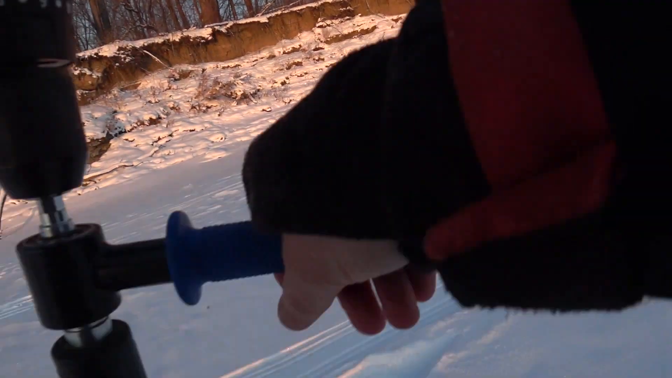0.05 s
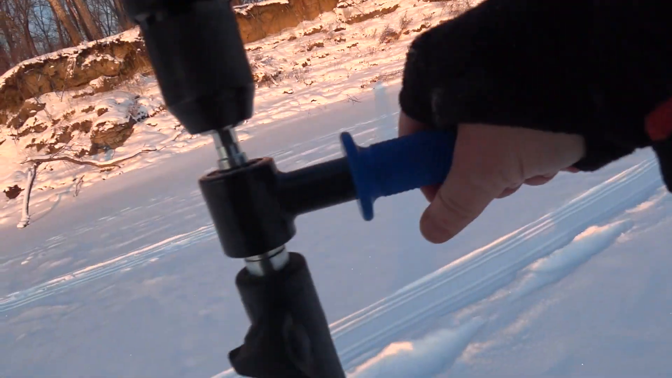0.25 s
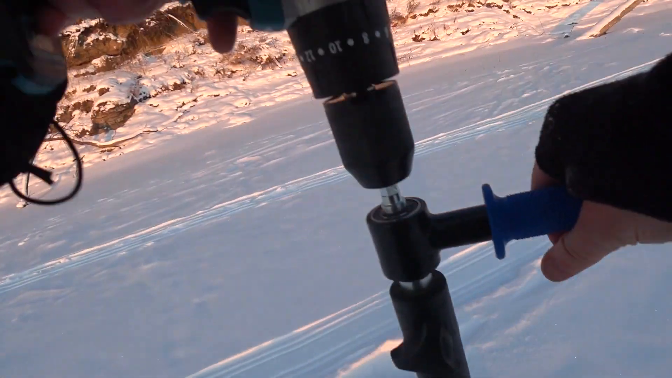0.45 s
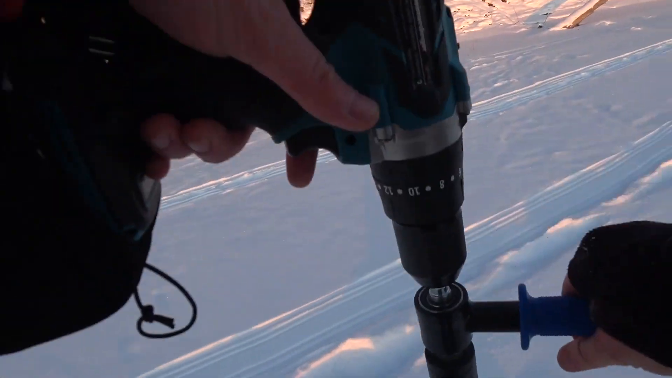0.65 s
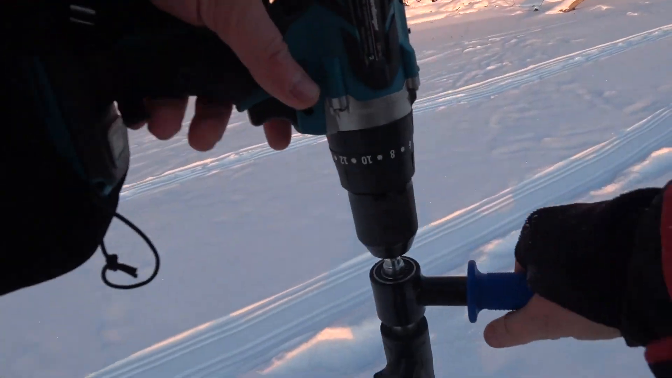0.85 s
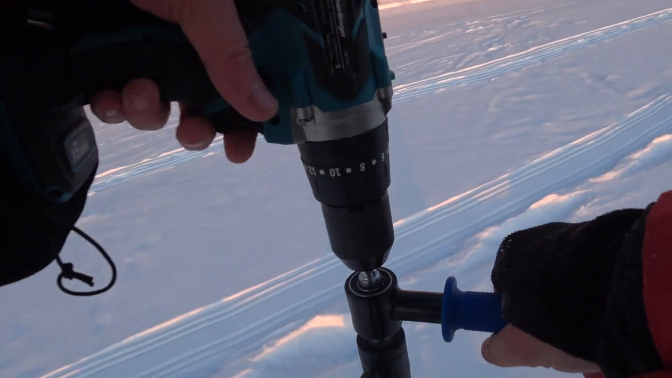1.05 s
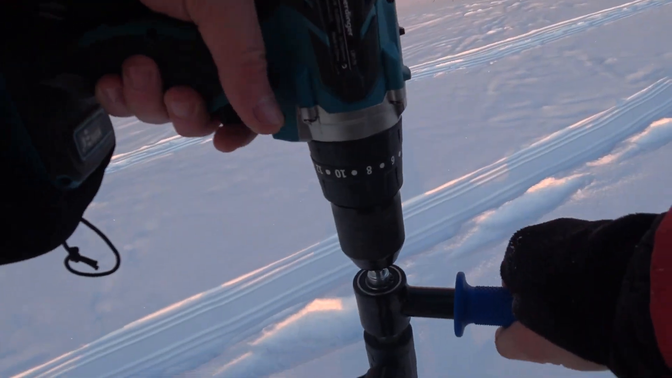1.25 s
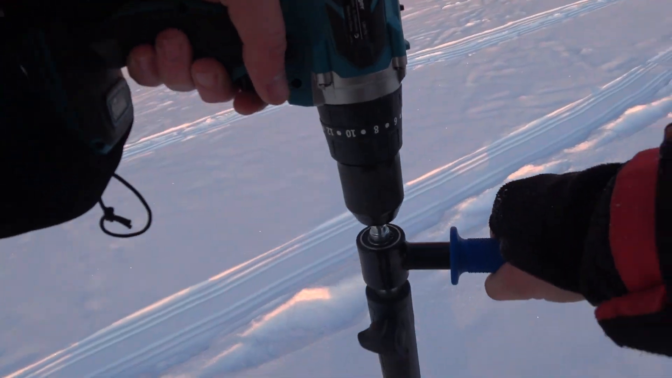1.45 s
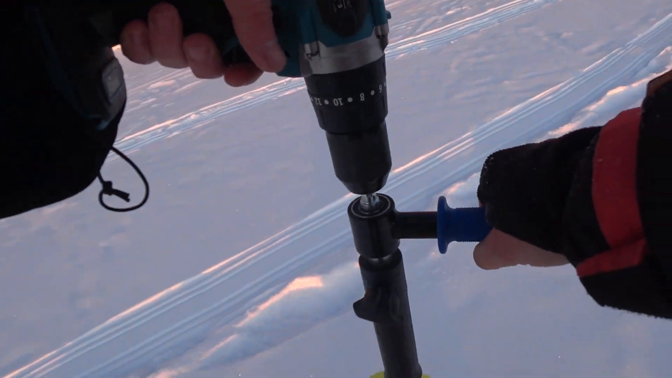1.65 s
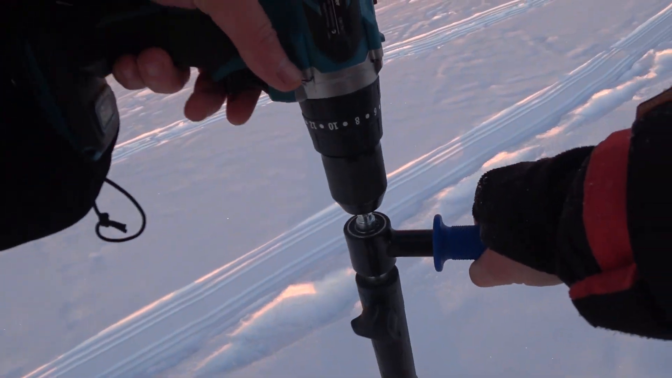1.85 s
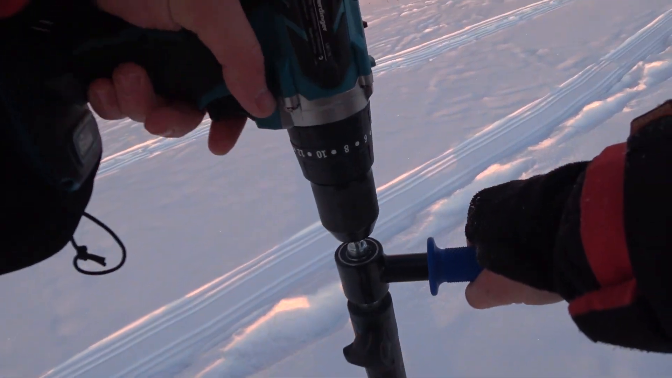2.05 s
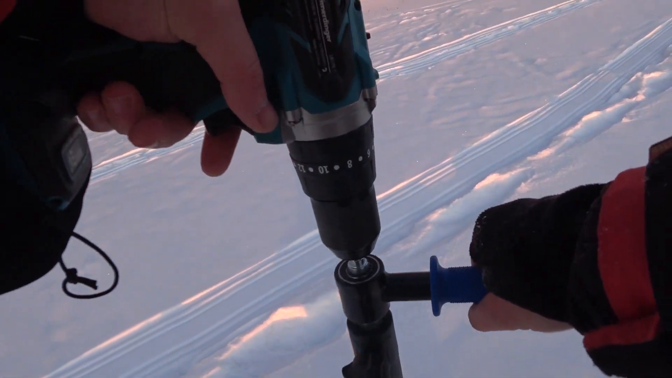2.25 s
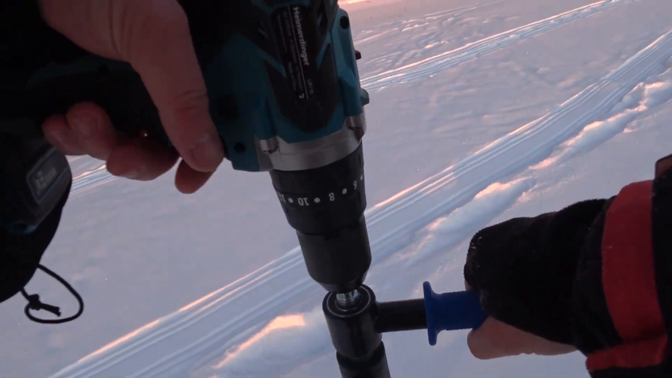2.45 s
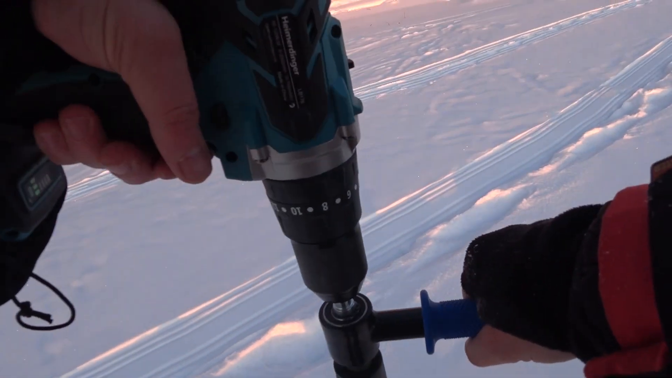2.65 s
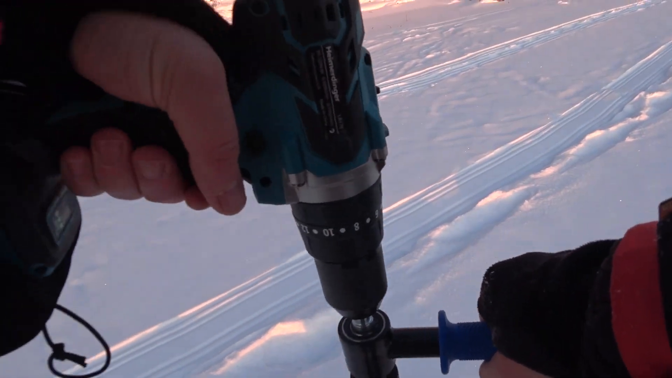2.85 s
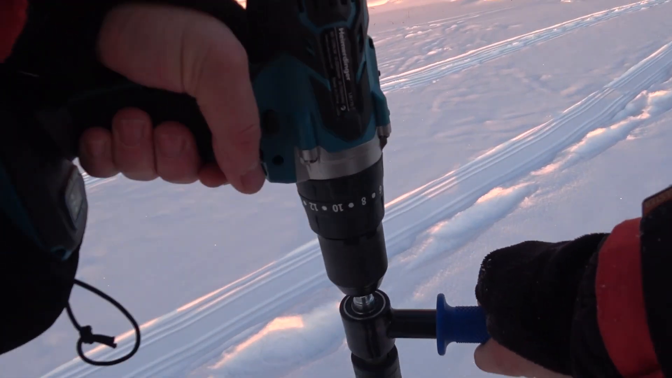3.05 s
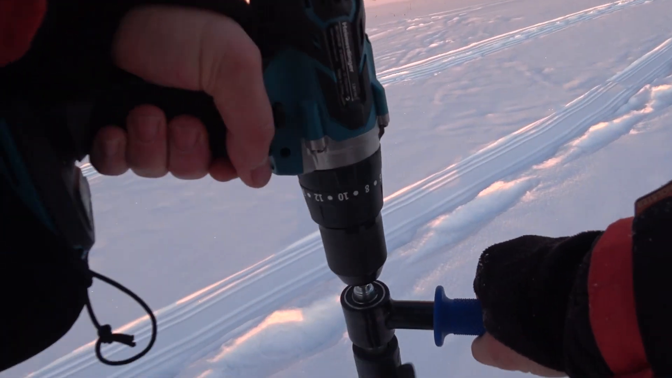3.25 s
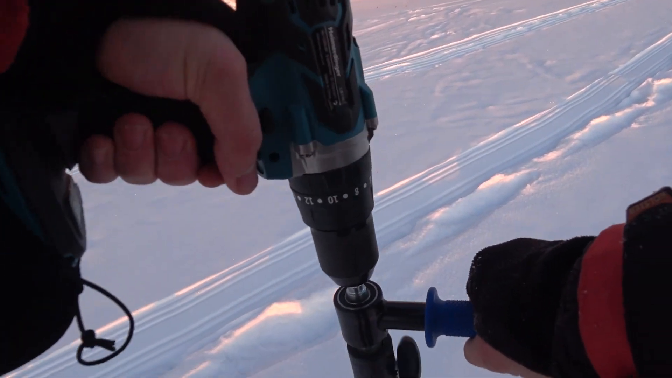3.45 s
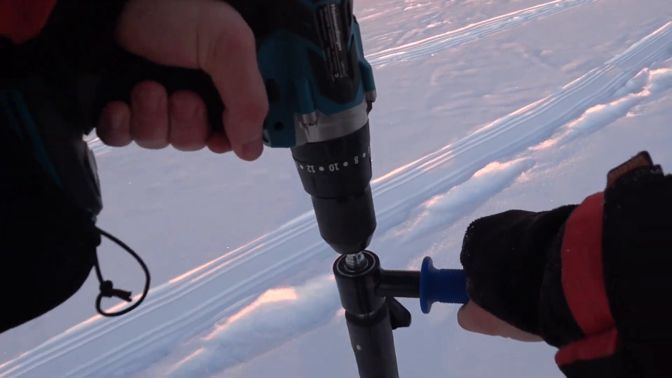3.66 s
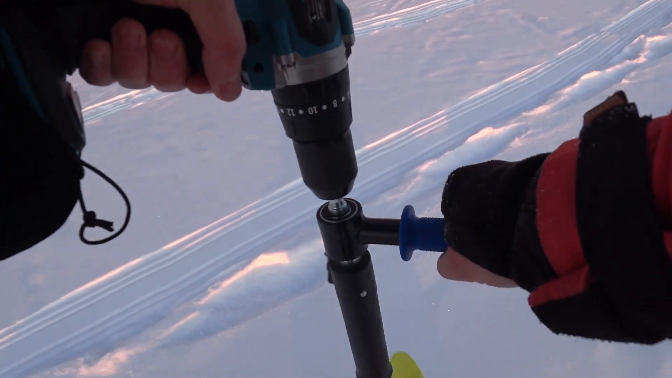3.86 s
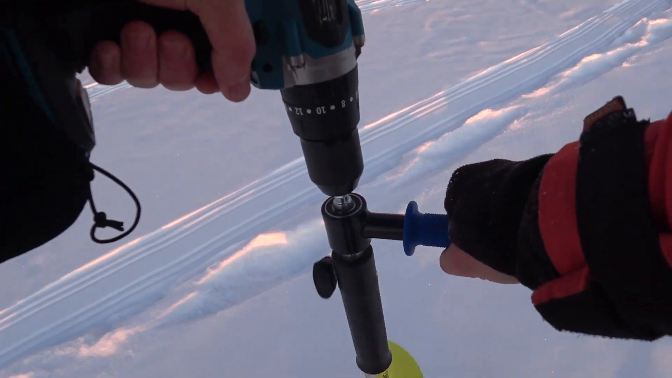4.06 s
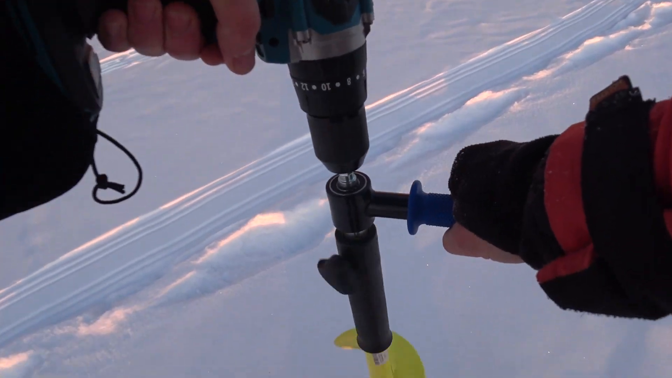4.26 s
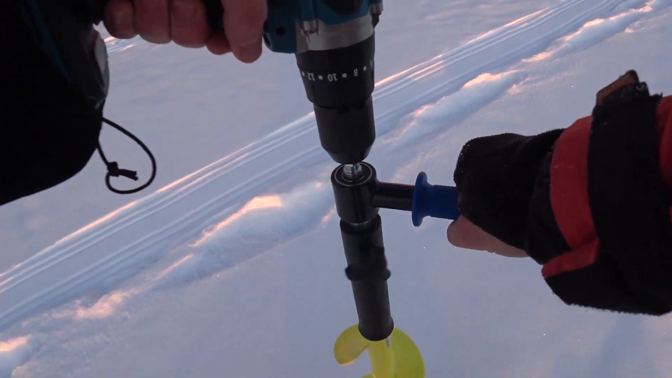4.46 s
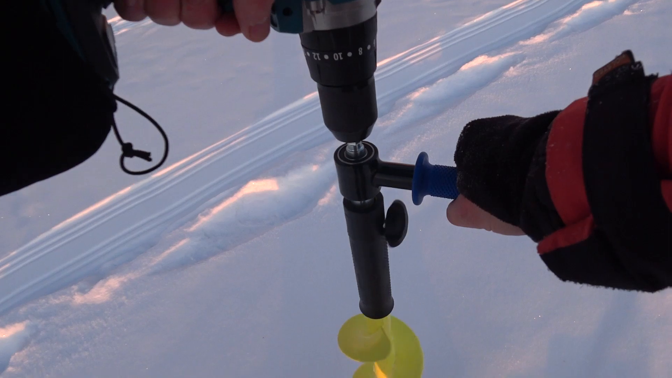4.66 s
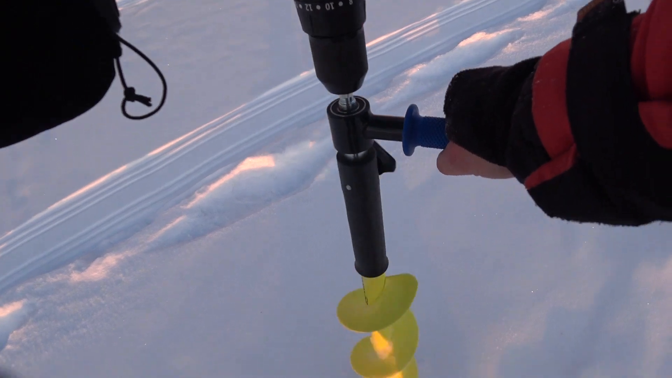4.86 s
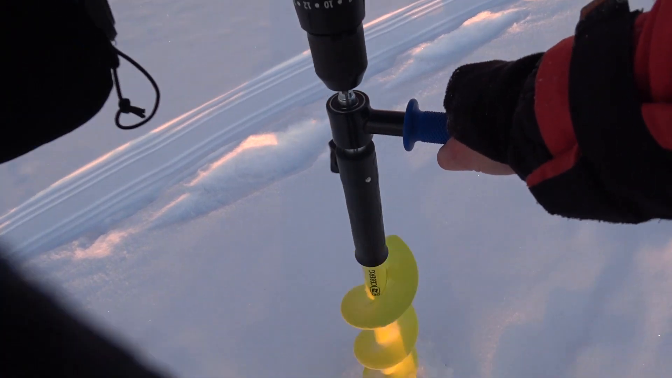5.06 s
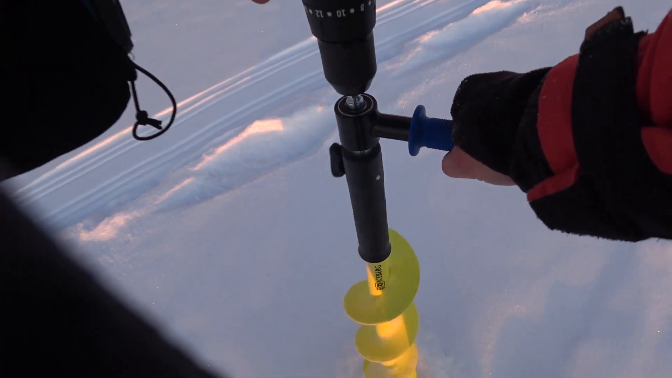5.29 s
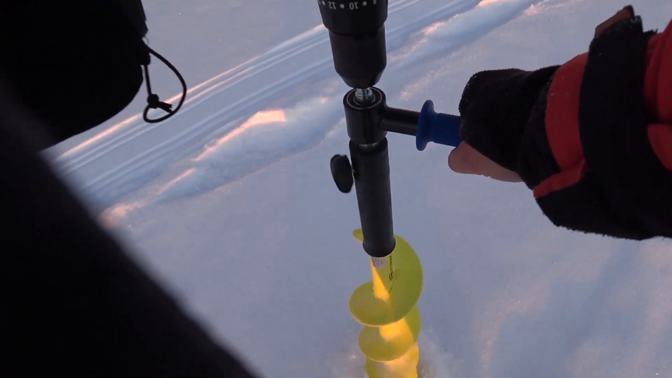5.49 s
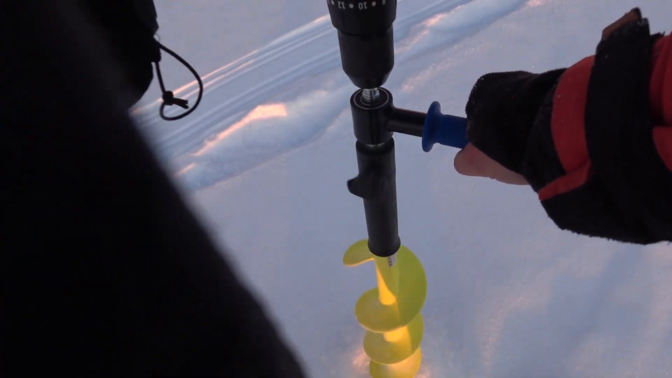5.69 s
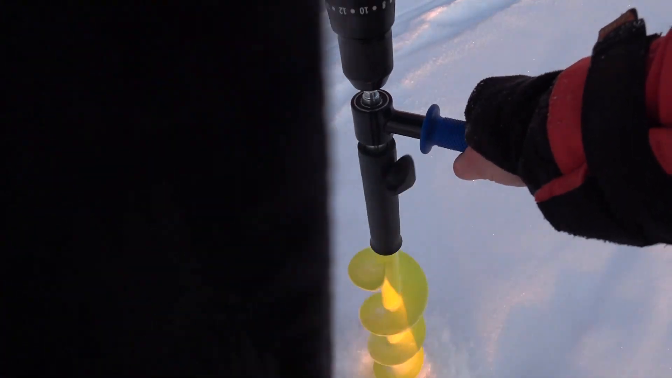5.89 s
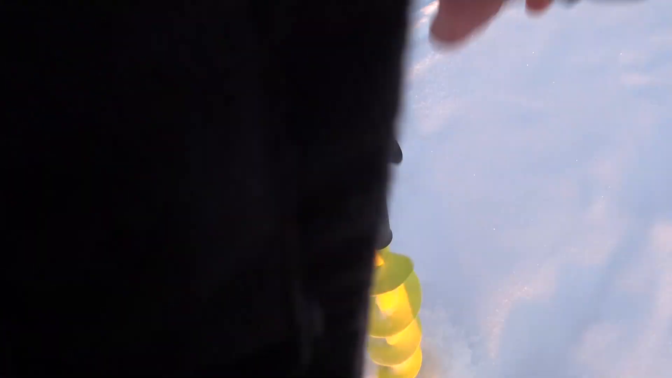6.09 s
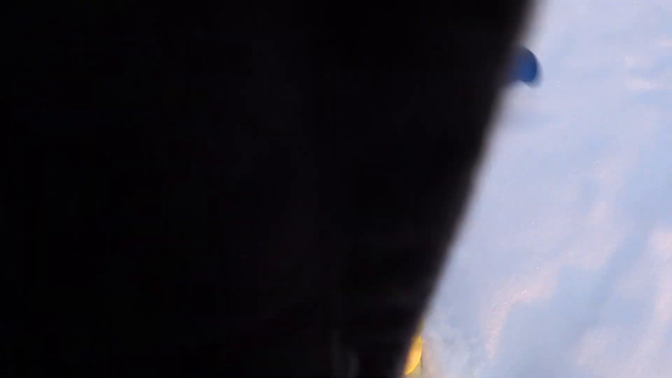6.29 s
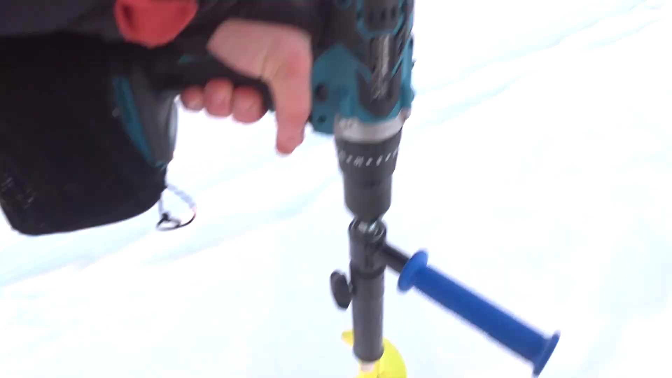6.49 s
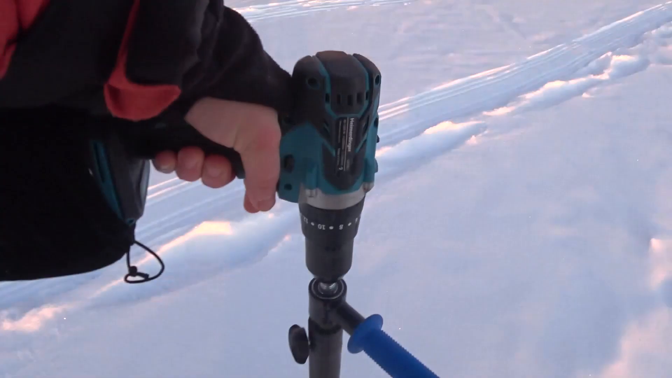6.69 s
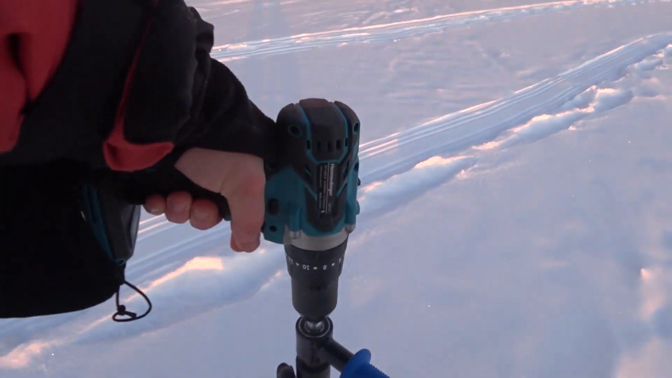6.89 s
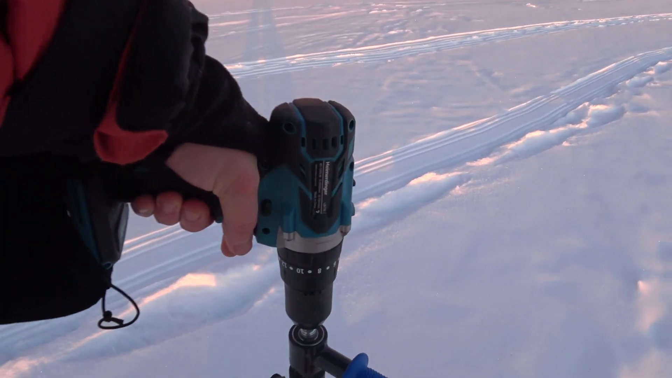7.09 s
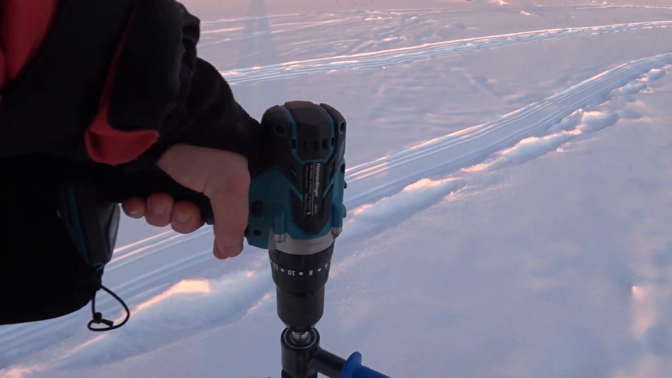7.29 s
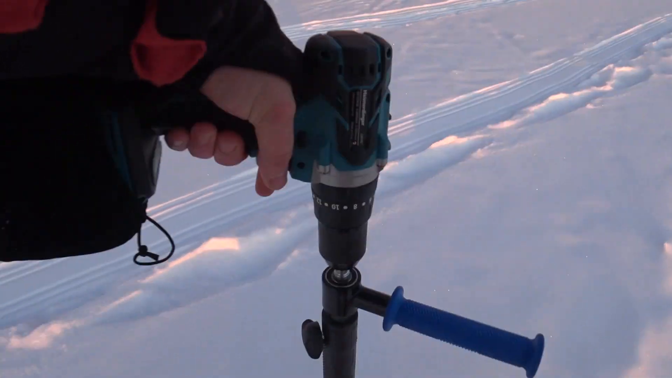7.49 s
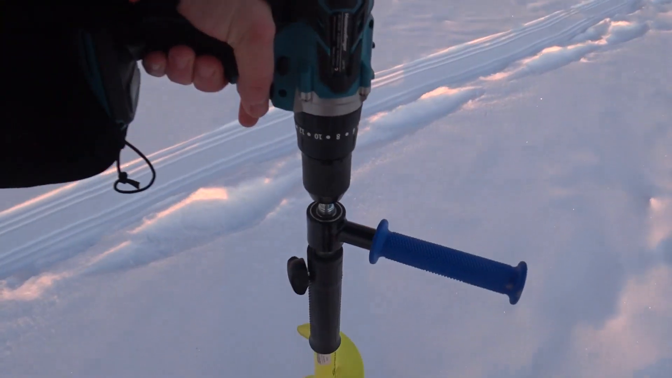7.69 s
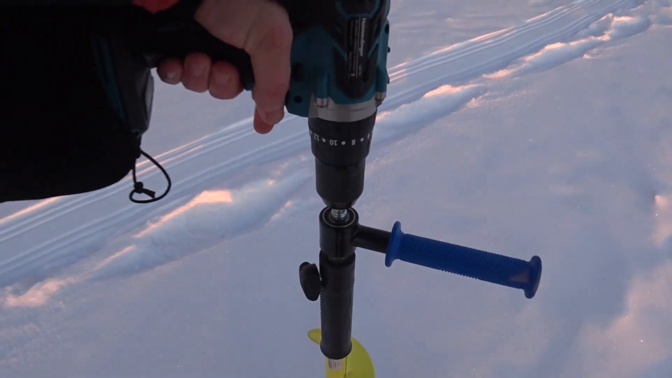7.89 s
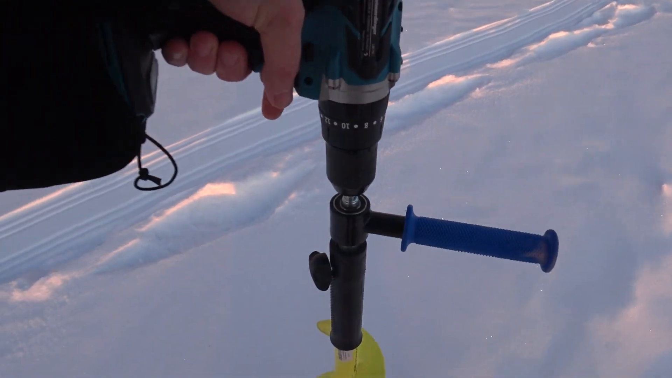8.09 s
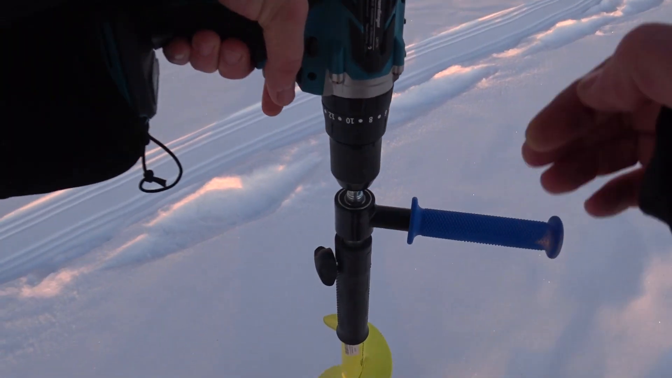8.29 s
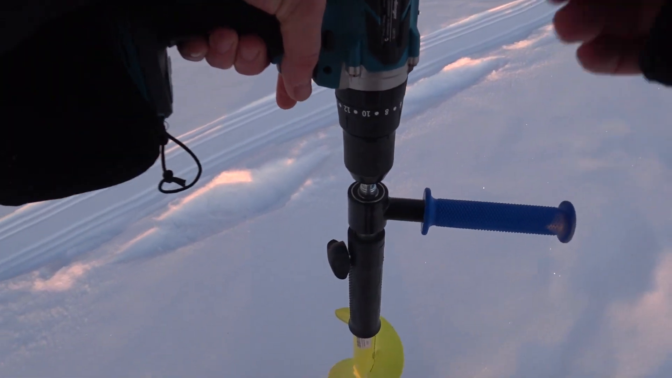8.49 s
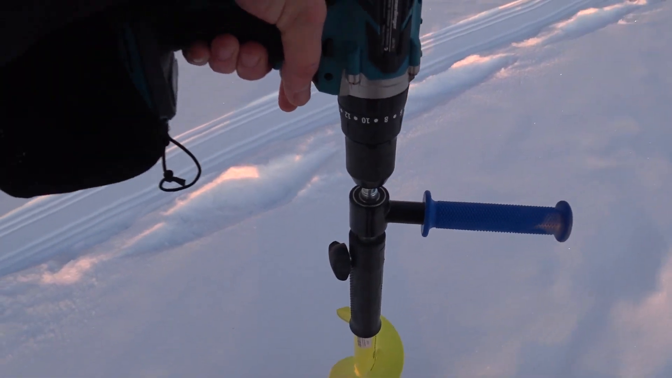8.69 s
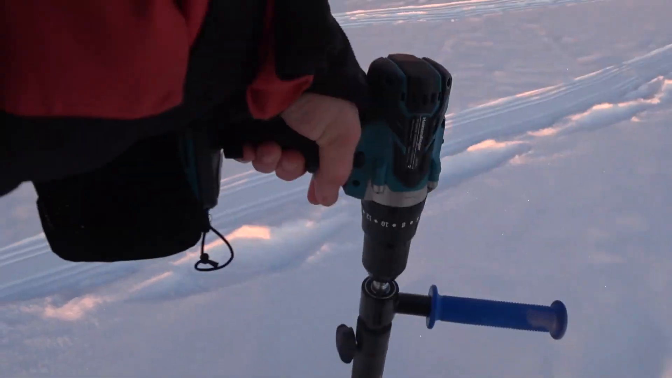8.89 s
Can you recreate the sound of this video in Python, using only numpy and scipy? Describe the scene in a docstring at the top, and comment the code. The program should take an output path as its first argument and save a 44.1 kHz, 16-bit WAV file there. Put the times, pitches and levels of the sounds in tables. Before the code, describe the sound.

Dry outdoor close-up with faint steady hiss. Rough sleeve brushing and dull snow creaks come first, with isolated crisp clicks. Then a drill motor whirs up, its gear whine dropping in pitch under load while blades shave ice in a coarse, gritty scrape. After about three and a half seconds it cuts off sharply, leaving cloth rustles, hard knocks and handling bumps right beside the microphone, slowly thinning out.

```python
"""Auger drill on ice, close to a camera. First a jacket rustles and brushes, snow creaks, the tool clicks:
shaped noise bursts and snow pulses. A trigger click, a short buzz of sine tones, then a free spin-up:
shaft-locked tones plus gear and fan noise. Under load the gears sing lower while ice scrapes in grainy noise.
A sleeve shades the treble, the motor stops, and the jacket, snow and clicks return. Faint hiss throughout."""
import sys
import numpy as np
from scipy import signal
from scipy.fft import rfft, irfft, next_fast_len
from scipy.io import wavfile
from scipy.ndimage import map_coordinates

SR = 44100
rng = np.random.default_rng(int(sys.argv[2]) if len(sys.argv) > 2 else 0)


def generate_wav(sig):
    """Save sig (samples, or channels by samples) to the path in sys.argv[1] as 16-bit PCM at SR."""
    pcm = np.round(np.clip(np.atleast_2d(sig).T, -1, 1) * 32767).astype(np.int16)
    wavfile.write(sys.argv[1], SR, pcm)


N = 394254
T = np.arange(N) / SR

# Levels and spectral densities are relative.
# stereo: freq_hz, left_right_correlation (0-1, as drawn)
CORRELATION = [(40, .65), (150, .75), (300, .85), (600, .92), (1200, .93), (3000, .87), (8000, .9)]
# phase lead of the left port: freq_hz, lead_rad
PORT_LEAD = [(60, 0), (180, .2), (350, .5), (700, .8), (1400, .62), (2800, .58), (5500, .32), (9000, .08)]
# level between the ports: freq_hz, left_minus_right_db
PORT_LEAN = [(150, -.8), (700, -1.2), (1400, -2.7), (2800, -2), (5500, -.7), (9000, -.7)]
# sleeve position; beside the camera each port hears its own cloth: time_s, left_minus_right_db, side_gain_db
HANDS = [(.5, -.7, 0), (1.5, .4, 0), (6.2, 1, 1), (6.6, 2.3, 8), (7.6, .8, 10), (8.7, 3, 8)]

# steady hiss: freq_hz, density_db
FLOOR_SPECTRUM = [(30, -26), (150, -8), (500, 0), (2000, 0.5), (11000, -14)]
# arm against the camera: center_s, sigma_s, level_db
NUDGES = [(0.19, 0.0039, -42), (0.565, .012, -45), (0.642, .02, -50), (6.382, 0.03, -37),
          (7.078, .035, -37), (7.41, 0.016, -26.5), (7.492, 0.021, -31), (7.698, 0.007, -27),
          (8.813, 0.091, -42.5)]
# camera-body rumble: freq_hz, density_db
NUDGE_SPECTRUM = [(25, -20), (70, -13.5), (160, 0.5), (300, 0), (600, -16), (1500, -53)]

# jacket movements: start_s, length_s, fade_s, body_db, swish_db, hiss_db
STROKES = [(-.03, 0.26, 0.048, -47.5, -44.5, -50), (0.284, .13, .03, -29, -28, -29),
           (0.429, 0.068, 0.0091, -25.5, -31, -37), (0.501, 0.2, .03, -52, -49, -47.5),
           (0.677, .27, .025, -34, -33.5, -36.5), (0.764, 0.13, .035, -25, -32, -47),
           (.97, 0.2, 0.11, -48, -42.5, -43.5), (1.305, 0.11, 0.21, -38.5, -42.5, -48),
           (1.68, 0.17, .03, -49.5, -49, -54), (2.44, .17, .012, -55.5, -53, -52),
           (6.303, 0.26, 0.058, -36, -34.5, -36.5), (6.651, 0.32, .03, -39.5, -39.5, -41),
           (6.917, 0.18, 0.017, -35, -34, -35.5), (7.016, 0.053, .015, -28, -50, -50),
           (7.1, .07, 0.053, -52, -53, -53), (7.328, .04, .02, -50, -48, -52),
           (7.373, .045, 0.043, -29.5, -30, -32), (7.452, .28, 0.072, -31, -29.5, -34),
           (7.548, 0.062, 0.029, -30.5, -25, -33), (7.841, 0.073, .012, -40, -33.5, -42),
           (7.9, 0.15, 0.022, -46, -46.5, -47), (8.025, 0.18, 0.16, -40, -35.5, -38.5),
           (8.59, 0.13, .03, -45.5, -43.5, -47), (8.705, 0.2, 0.045, -37, -34.5, -35.5),
           (8.835, .045, 0.022, -32.5, -34, -40)]
# cloth layers, low to high: freq_hz, density_db
BODY_SPECTRUM = [(25, -43.5), (60, -46), (130, -20), (250, -6), (450, 1), (850, 0.5), (1400, -2),
                 (2200, -13), (4000, -51)]
SWISH_SPECTRUM = [(700, -14), (1500, -3), (2400, -1), (4200, -6.5), (6500, -15.5)]
HISS_SPECTRUM = [(2800, -15), (4600, 0), (7500, 0), (9500, -2.5), (11000, -9)]
# cloth sliding over cloth: center_s, sigma_s, level_db, band_center_hz
ZIPS = [(.385, 0.013, -25, 655), (0.848, 0.05, -26.5, 615), (6.512, 0.036, -22.5, 7860),
        (7.606, 0.042, -31, 6000), (7.628, 0.0087, -23, 950), (7.745, .01, -24.5, 955),
        (7.81, .03, -37.5, 850), (7.877, .014, -31.5, 1500), (8.107, 0.082, -40.5, 4300),
        (8.226, 0.02, -30.5, 7800), (8.628, 0.032, -41.5, 4260), (8.86, 0.029, -32, 8000)]
# sleeve brushes: start_s, level_db, length_s (before decay), treble_db (at 5 kHz and above)
SCUFFS = [(0.152, -23, 0.008, 1), (0.223, -24, 0.0088, 9.5), (0.254, -22.5, 0.0076, 7),
          (0.276, -23, 0.013, 3), (0.37, -25, 0.019, -13), (0.583, -29, 0.015, -2),
          (0.684, -23.5, 0.0053, -4.5), (0.976, -30.5, 0.0174, 6), (1.053, -27, 0.018, 4.5),
          (6.382, -23, 0.0086, -13), (7.103, -30.5, 0.015, 7), (7.387, -22.5, .025, -3),
          (7.487, -17.5, 0.017, -1.5), (7.574, -24, 0.013, 12), (7.628, -13, 0.0035, 1),
          (7.69, -12.5, 0.0086, 4), (7.723, -19, 0.0067, -4), (7.741, -22.5, 0.008, -5.5),
          (7.887, -29.5, 0.0057, -4), (7.911, -28.5, 0.015, 2.5)]
# sleeve friction: freq_hz, density_db
SCUFF_SPECTRUM = [(30, -38), (100, -26), (250, 0), (600, 5.5), (1000, 1.5), (1800, -3.5), (4000, -10),
                  (8000, -13.5), (11000, -20.5)]

# single slips of packed snow: time_s, level_db, crispness_db
CREAKS = [(0.15, -17, -7), (0.281, -15, -17), (1.272, -24.5, -21), (1.321, -28.5, -17.5),
          (1.621, -28.5, -22), (1.634, -23, -28), (1.652, -12, -32), (1.662, -21, -24), (1.716, -29, -17),
          (1.754, -12.5, -17), (1.805, -16, -22), (2.11, -23, -23), (2.153, -20.5, -22),
          (2.332, -23, -17.5), (2.407, -26, -21), (2.419, -23, -14.5), (2.523, -33.5, -19),
          (2.616, -29, -10), (6.387, -17.5, -10), (7.411, -9.5, -25), (7.744, -17, -27), (7.97, -27.5, -16)]
# runs of slips as weight shifts: start_s, end_s, slips_per_s, level_db
CREAK_RUNS = [(1.337, 1.442, 68, -19.5), (1.478, 1.56, 70, -17.5), (2.177, 2.305, 66, -30)]
# packed snow: freq_hz, density_db
SNOW_SPECTRUM = [(40, -52), (150, -27.5), (330, -3.5), (520, 2), (1100, -1), (1700, -12.5), (2600, -15.5),
                 (4000, -28), (11000, -56)]
# hard tool contacts: start_s, level_db, center_hz
CLICKS = [(0.525, -25, 8500), (0.796, -13, 5010), (1.1676, -7.5, 7000), (1.767, -13, 8150),
          (1.843, -27, 4000), (2.0074, -10, 7480), (2.008, -17.5, 1400), (2.4586, -21.5, 7700),
          (2.6542, -12.5, 9000), (2.74, -2, 7000), (6.389, -10, 6550), (6.4245, -12.5, 10000),
          (6.427, -5, 10000), (6.663, -18, 6590), (6.724, -6, 8800), (7.3855, -10, 8600),
          (7.406, -12, 5000), (7.414, -1, 1500), (7.629, -2.5, 4000), (7.694, -2.5, 4000),
          (8.511, -25.5, 7860)]

# running motor before creep and braking: time_s, speed_hz (turns per second)
SPEED = [(2.83, 251.3), (2.92, 253.7), (3.11, 241.4), (3.3, 213.3), (3.53, 204.5), (3.86, 200.4),
         (4.2, 200.1), (4.41, 204.2), (4.45, 199.5), (4.59, 205.0), (4.61, 199.3), (5.27, 196.6),
         (5.46, 201.0), (5.68, 197), (5.91, 202.4), (6.08, 198), (6.23, 203.1), (6.27, 202.1)]
# windings before the rotor turns: freq_hz, level_db
BUZZ = [(1900, -23), (2150, -18.5), (3187, -19), (4673, -22), (5728, -24), (7004, -35), (8495, -35),
        (9981, -21)]
# gear and fan noise: freq_hz, density_db
RUSH_SPECTRUM = [(30, -59), (150, -45.5), (330, -32), (500, -15.5), (900, -10.5), (1500, -8), (3000, -6),
                 (4400, -5.5), (5900, -3), (7600, 1), (8800, -2.5), (10000, -1.5), (11000, -9.5)]
# tooth and pole tones: order (rounded for pitch), free_db, startup_db, full_load_db,
# cutting_drift_db_per_s, roughness (0-1, before chatter)
TEETH = [(11.97, -30.5, 1, 5, -2.7, .4), (16.04, -28, 6.5, -5, 1.0, .4), (24.07, -30, -9, 1, -1.07, 0.7),
         (36.2, -31.5, -9, 8.5, 0, 0.5), (40.06, -33.5, -8, 3, 0.5, .6), (48.4, -34, -10, 4.5, 1, .8)]
# gear-housing resonances: center_hz, half_width_hz (to 1/e of the boost), boost_db
HOUSING = [(2504, 173, 13.5), (3190, 71, 3.5), (4800, 97, 6.5), (5880, 110, 9), (7540, 350, 2.5),
           (8470, 430, 12)]
# lesser rotor overtones: order (multiple of speed), level_db
WHINE = [(18, -36), (20, -35), (25, -32.5), (28, -34.5), (29, -37), (31, -33), (34, -37.5), (37, -30),
         (42, -38), (46, -32), (47, -32), (49, -31)]
# shaved ice: freq_hz, density_db
SHAVINGS_SPECTRUM = [(30, -58), (120, -29.5), (300, -24), (520, -12.5), (740, -20.5), (950, -11.5),
                     (1100, -1), (1650, -2), (2000, -5.5), (2600, -7), (3100, -31), (6000, -24)]
# auger-tube resonances: center_hz, width_hz, level_db
TUBE = [(611, 36.4, -4), (1101, 64, -2), (1433, 61, -5), (1658, 97, -3)]
# sleeve before the microphone: freq_hz, gain_db
SHADE = [(1000, 1), (2500, 0), (7000, -3), (11000, -1.5)]

STROKE_RISE_S = 0.023
SNAPS_PER_S, SNAP_DB, SNAP_SCATTER_DB, SNAP_DECAY_S = 11, 2, 3.5, .0015
SLIP_JITTER_GAPS, SLIP_SCATTER_DB, SLIP_CRISP_DB = .15, 2, -19

# shaft: trigger half pressed, squeezed home, released
FREE_HZ, LOADED_HZ = 252, 200
CREEP_HZ, SQUEEZE_AT_S, SQUEEZE_S = 147.9, 2.771, .008
HUNT_HZ, HUNT_PERIOD_S, HUNT_TOP_S = 10, .056, 2.706  # drive slack makes the creep speed hunt
LET_GO_AT_S, BRAKE_HZ_PER_S = 6.275, 500
UP_TO_SPEED_S, STRAIN_FADE_S = 2.825, .02  # start-up torque strains the teeth until here
TOOTH_WAVER_DB = 1.0
RUSH_DB, CREEP_DROP_DB, SINK_DB_PER_S = -11, 6.5, 0.53  # rush falls as the auger sinks away
BITE_AT_S, DEEPEN_S = 3.056, 0.6
SCRAPE_DB, SHALLOW_DROP_DB = -17, 6.5
SURGE_AT_S, SURGE_SIGMA_S, SURGE_DB = 6.07, .035, 2.2  # one harder bite
SHADE_AT_S, SHADE_S = 6.0, .04
TOP_HZ = 11100


def amp(db):
    """Decibels to gain."""
    return 10 ** (np.asarray(db) / 20)


def unit(x):
    """Scale to rms 1."""
    return x / np.sqrt(np.mean(np.abs(x) ** 2) + 1e-20)


def along(points, hz):
    """Interpolate (freq_hz, value) points on a log frequency axis."""
    f, v = np.transpose(points)
    return np.interp(np.log(hz + 1), np.log(f + 1), v)


def curves(rows):
    """One value per sample for each column after the time."""
    s, *cols = np.transpose(rows)
    return [np.interp(T, s, c) for c in cols]


def wobble(knots_per_s):
    """Smooth random curve of rms 1."""
    knots = rng.standard_normal(int(N * knots_per_s / SR) + 4)
    return unit(map_coordinates(knots, [T * knots_per_s]))


def bump(center_s, sigma_s):
    """Gaussian swell peaking at 1."""
    return np.exp(-.5 * ((T - center_s) / sigma_s) ** 2)


def ease(at_s, width_s):
    """Smooth step from 0 to 1 around a time."""
    return .5 + .5 * np.tanh((T - at_s) / (2 * width_s))


def gate(start_s, stop_s, rise_s, fall_s):
    """1 between two times, with straight edges."""
    return np.clip((T - start_s) / rise_s, 0, 1) * np.clip((stop_s - T) / fall_s, 0, 1)


def filtered(x, response):
    """Apply a complex frequency response to x."""
    n = x.shape[-1]
    m = next_fast_len(n + 4096)
    return irfft(rfft(x, m) * response(np.fft.rfftfreq(m, 1 / SR)), m)[..., :n]


def colour(points):
    """Response following (freq_hz, db) points."""
    return lambda hz: amp(along(points, hz))


def ringing(modes):
    """Sum of (center_hz, width_hz, level_db) resonances with alternating sign."""
    def response(f):
        total = 0
        for k, (center, width, db) in enumerate(modes):
            damping = 1j * f * width
            total = total + (-1) ** k * amp(db) * damping / (center ** 2 - f ** 2 + damping)
        return total
    return response


def noise(response, grain=1, size=N):
    """Stereo noise of rms 1; grain roughens it before colouring."""
    def mid_side(hz):
        turn = np.arccos(np.clip(along(CORRELATION, hz), -1, 1)) / 2
        return response(hz) * np.array([np.cos(turn), np.sin(turn)])
    mid, side = filtered(rng.standard_normal((2, size)) * grain, mid_side)
    return unit(np.array([mid + side, mid - side]))


def tone_sine(hz):
    """Steady sine of rms 1 with random phase."""
    return np.sqrt(2) * np.sin(2 * np.pi * hz * T + rng.uniform(0, 2 * np.pi))


def add(out, start_s, sound):
    """Mix in a short sound, cut at the end of the scene."""
    part = out[..., round(start_s * SR):][..., :sound.shape[-1]]
    part += sound[..., :part.shape[-1]]


def floor():
    """Faint steady hiss: coloured stationary noise."""
    return amp(-55.5) * noise(colour(FLOOR_SPECTRUM))


def nudges():
    """Soft bumps travel through the camera body as a short rumble."""
    swell = sum(amp(db) * bump(s, sigma) for s, sigma, db in NUDGES)
    return swell * noise(colour(NUDGE_SPECTRUM))


def strokes():
    """Body, swish and hiss gains: movements rise, hold and fade over a base of slight motion."""
    power = amp([[-59], [-60], [-63]]) ** 2 * np.ones(N)
    for s, length, fade, *layers_db in STROKES:
        rise = np.clip((T - s) / STROKE_RISE_S, 0, 1)
        shape = rise * np.exp(-np.clip((T - s - length) / fade, 0, 20))
        power += np.outer(amp(layers_db) ** 2, shape ** 2)
    return np.sqrt(power)


def snaps(swish_gain):
    """Stiff folds snap at random: decaying noise bursts scaled by the swish gain."""
    count = round(SNAPS_PER_S * N / SR)
    kicks = np.zeros(N)
    scatter_db = SNAP_SCATTER_DB * rng.uniform(-1, 1, count) * np.sqrt(3)
    kicks[rng.integers(N, size=count)] = amp(SNAP_DB + scatter_db)
    shape = signal.lfilter([1], [1, -np.exp(-1 / (SNAP_DECAY_S * SR))], kicks)
    cloth = noise(colour(BODY_SPECTRUM)) + noise(colour(SWISH_SPECTRUM)) + noise(colour(HISS_SPECTRUM))
    return swish_gain * shape * cloth


def jacket():
    """Stiff cloth slides over itself: threads catch in fine grains, folds in coarser crunches."""
    body_gain, swish_gain, hiss_gain = strokes() * amp(.7 * wobble(35))
    folds = amp(2.2 * wobble(260))
    threads = folds * amp(1.05 * wobble(1400))
    body = body_gain * amp(1.6 * wobble(50)) * noise(colour(BODY_SPECTRUM), threads)
    swish = swish_gain * noise(colour(SWISH_SPECTRUM), threads)
    hiss_grain = np.sqrt(folds) * amp(2.9 * wobble(1500))
    hiss = hiss_gain * noise(colour(HISS_SPECTRUM), hiss_grain)
    return body + swish + hiss + snaps(swish_gain)


def zips():
    """Weave ribs pass each other at an uneven rate: one broad noise band per slide."""
    out = np.zeros((2, N))
    for s, sigma, db, hz in ZIPS:
        weave = ringing([(hz, .45 * hz, 0)])
        out += amp(db) * bump(s, sigma) * noise(lambda f: weave(f) ** 2)
    return out


def scuffs():
    """Short sleeve brushes: bursts of coarse friction noise that stop quickly."""
    out, t = np.zeros((2, N)), np.arange(SR // 12) / SR
    for s, db, length, treble_db in SCUFFS:
        treble = colour([(800, 0), (5000, treble_db)])
        shape = np.minimum(t / 0.002, 1) * amp(-60 * np.maximum(t - length, 0) / 0.01)
        friction = noise(lambda hz: colour(SCUFF_SPECTRUM)(hz) * treble(hz), size=len(t))
        add(out, s, amp(db) * shape * friction)
    return out


def slips():
    """Stick and slip: each creaking run breaks into unevenly spaced slips of uneven level."""
    rows = []
    for start, end, rate, db in CREAK_RUNS:
        chance = rng.standard_normal((32, 2))
        for s, (late, louder) in zip(np.arange(start, end, 1 / rate), chance):
            rows.append((s + SLIP_JITTER_GAPS * late / rate, db + SLIP_SCATTER_DB * louder, SLIP_CRISP_DB))
    return rows


def creaks():
    """Each snow slip is a dull, quickly damped push with crumbling noise and a crisp edge."""
    out, t = np.zeros((2, N)), np.arange(2048) / SR
    crumbling = np.roll(amp(-60 * t / .016), 50)
    for s, db, crisp_db in CREAKS + slips():
        hz = np.fft.rfftfreq(len(t), 1 / SR) * np.exp(0.08 * rng.standard_normal())  # vary the pitch
        # fold the cepstrum to get a causal pulse with the snow spectrum
        cepstrum = irfft(np.log(colour(SNOW_SPECTRUM)(hz)))
        folded = cepstrum * 2 * (np.arange(len(t)) < len(t) // 2)
        push = irfft(np.exp(rfft(folded)))
        crumble = 0.053 * noise(colour(SNOW_SPECTRUM), crumbling, size=len(t))
        edge = amp(crisp_db - 2.0) * noise(colour(HISS_SPECTRUM), size=len(t)) * amp(-60 * t / 0.013)
        add(out, s + .0025, amp(db + 1.5) * (push / np.abs(push).max() + crumble + edge))
    return out


def clicks():
    """Hard, barely ringing contacts of chuck, handle and trigger: resonant noise, two decays."""
    out, t = np.zeros((2, N)), np.arange(SR // 20) / SR
    shape = amp(-60 * t / 0.015) + amp(-20.5) * amp(-60 * t / 0.032)
    for s, db, hz in CLICKS:
        shell = ringing([(hz, 5000, 0), (2500, 900, -7), (9800, 1500, -5)])
        add(out, s, amp(db - 6.5) * shape * noise(shell, size=len(t)))
    return out


def shaft():
    """Motor speed in Hz, trigger squeeze (0-1), and load (0-1) taken from the running-speed sag."""
    running, = curves(SPEED)
    trigger = ease(SQUEEZE_AT_S, SQUEEZE_S)
    braking = BRAKE_HZ_PER_S * np.maximum(T - LET_GO_AT_S, 0)
    creep = CREEP_HZ + HUNT_HZ * np.cos(2 * np.pi * (T - HUNT_TOP_S) / HUNT_PERIOD_S)
    speed = np.maximum(creep + trigger * (running - creep) - braking, 0)
    load = np.clip((FREE_HZ - running) / (FREE_HZ - LOADED_HZ), 0, 1)
    return speed, trigger, load


def buzz():
    """Windings buzz before the rotor turns: steady sines plus a little noise."""
    tones = sum(amp(db) * tone_sine(hz) for hz, db in BUZZ)
    sound = tones + amp(-16) * noise(colour(RUSH_SPECTRUM))
    return sound * gate(2.6755, 2.694, rise_s=0.0013, fall_s=0.0066)


def rush(angle, trigger, cutting_s):
    """Gear and fan noise, modulated once a turn."""
    level_db = RUSH_DB - CREEP_DROP_DB * (1 - trigger) - SINK_DB_PER_S * cutting_s
    once_a_turn = 1 + 0.14 * np.cos(angle)
    grain = once_a_turn * amp(0.86 * wobble(1500))
    return amp(level_db + 0.7 * wobble(60)) * noise(colour(RUSH_SPECTRUM), grain)


def fan(speed):
    """Running free, the fan makes the vents ring in two broad bands; level rises with speed and falls as the
    speed drops."""
    low, high = ringing([(5900, 450, 0)]), ringing([(8150, 1100, -3)])
    level_db = -18.0 + 0.35 * (np.minimum(speed, 250) - 248.0)
    return amp(level_db) * noise(lambda f: low(f) ** 2 + high(f) ** 2)


def gears(speed, angle, load, cutting_s):
    """Tooth and pole tones follow the shaft, shift in level with load and swell at housing resonances."""
    on = (T > 2.6) & (T < 6.4)
    sway = signal.sosfilt(signal.butter(2, 130, fs=SR, output="sos"), rng.standard_normal((2, N)))
    skirt = unit(sway[0] + 1j * sway[1])

    def housing_db(hz):
        """Boost at a tone's frequency."""
        return sum(db * np.exp(-((hz - center) / half) ** 2) for center, half, db in HOUSING)

    def tone(order, rough):
        """One multiple of shaft speed; uneven teeth smear part of it into a fuzzy skirt."""
        out = np.zeros(N)
        smear = (1 + rough * np.roll(skirt, rng.integers(N))[on]) / np.hypot(1, rough)
        phase = round(order) * angle[on] + rng.uniform(0, 2 * np.pi)
        out[on] = np.sqrt(2) * np.real(smear * np.exp(1j * phase))
        return out

    strain = 1 - ease(UP_TO_SPEED_S, STRAIN_FADE_S)
    chatter = 0.54 * (1 - np.maximum(load, strain)[on])  # unloaded gears run rougher
    mesh = np.zeros(N)
    for order, db, start_db, load_db, drift_db, rough in TEETH:
        effort_db = start_db * strain + load_db * load + drift_db * cutting_s + TOOTH_WAVER_DB * wobble(7)
        ring_db = housing_db(order * speed) * (1 - 0.64 * strain)  # a quick sweep rings the housing less
        mesh += amp(db + effort_db + ring_db) * tone(order, rough + chatter)
    poles = amp(-32.5 + .09 * (speed - LOADED_HZ)) * tone(order=4, rough=.3 + .2 * load[on])
    poles += amp(-53 + 0.15 * (speed - FREE_HZ)) * tone(order=1, rough=0.5)  # imbalance, strongest at top speed
    poles += amp(-31.5 + 0.08 * (speed - FREE_HZ)) * tone(order=8, rough=0.45)
    whine = sum(amp(db) * tone(order, rough=0.95) for order, db in WHINE)
    return mesh + poles + whine


def scrape(cutting_s):
    """Blades shave ice in noise grains that ring the auger tube, harder as the cut deepens."""
    chips = amp(2.8 * wobble(500))
    ice = noise(colour(SHAVINGS_SPECTRUM), chips) + amp(-3) * noise(ringing(TUBE), chips)
    level_db = SCRAPE_DB - SHALLOW_DROP_DB * np.exp(-cutting_s / DEEPEN_S)
    level_db += SURGE_DB * bump(SURGE_AT_S, SURGE_SIGMA_S)
    flutter_db = .55 * wobble(16) + 0.72 * wobble(40)
    return amp(level_db + flutter_db) * gate(BITE_AT_S, 6.335, rise_s=0.33, fall_s=0.027) * ice


def drill():
    """Rush, fan and gears share one shaft; the sleeve shades them; scrape and buzz add to it."""
    speed, trigger, load = shaft()
    cutting_s = np.maximum(T - BITE_AT_S, 0)
    angle = 2 * np.pi * np.cumsum(speed * (1 + 0.002055 * wobble(45))) / SR
    motor = rush(angle, trigger, cutting_s) + fan(speed) + gears(speed, angle, load, cutting_s)
    motor = motor * gate(2.688, 6.325, rise_s=.004, fall_s=0.035)
    shaded = ease(SHADE_AT_S, SHADE_S)
    motor = (1 - shaded) * motor + shaded * filtered(motor, colour(SHADE))
    return motor + scrape(cutting_s) + buzz()


def ports(x):
    """Two microphone ports differ slightly in phase and level."""
    sides = np.array([[.5], [-.5]])

    def response(hz):
        return amp(sides * along(PORT_LEAN, hz)) * np.exp(1j * sides * along(PORT_LEAD, hz))
    return filtered(x, response)


def scene():
    """Open air over snow, no echo: hiss, handling with moving pan and width, and drill."""
    pan_db, width_db = curves(HANDS)
    left, right = nudges() + jacket() + zips() + scuffs() + creaks() + clicks()
    mid, side = (left + right) / 2, amp(width_db) * (left - right) / 2
    handling = np.array([mid + side, mid - side]) * amp([pan_db / 2, -pan_db / 2])
    return ports(floor() + handling + drill())


def record(dry):
    """The camera thins deep bass, rounds off the highest peaks and cuts above its band limit."""
    thin = signal.sosfilt(signal.butter(1, 85, "high", fs=SR, output="sos"), dry)
    rounded = thin / (1 + np.abs(thin / 1.05) ** 8) ** (1 / 8)
    return filtered(rounded, lambda hz: hz < TOP_HZ)


dry = scene()
out = record(dry)
generate_wav(out)
```